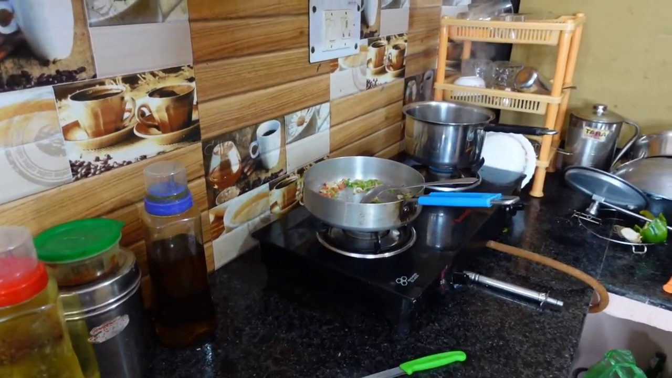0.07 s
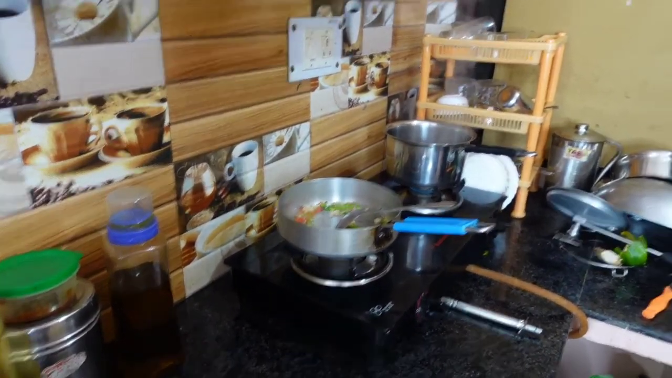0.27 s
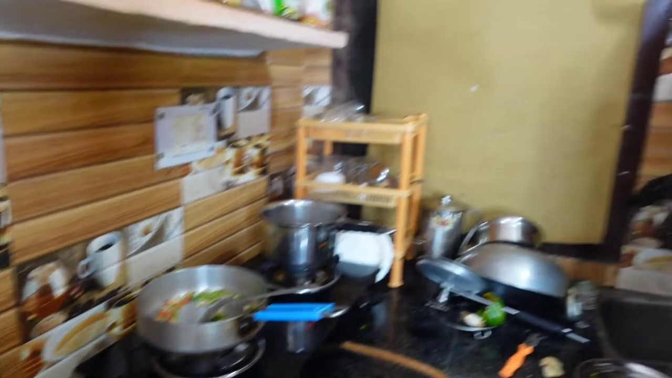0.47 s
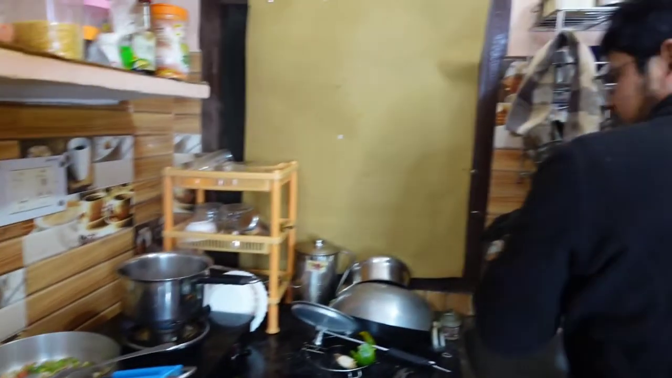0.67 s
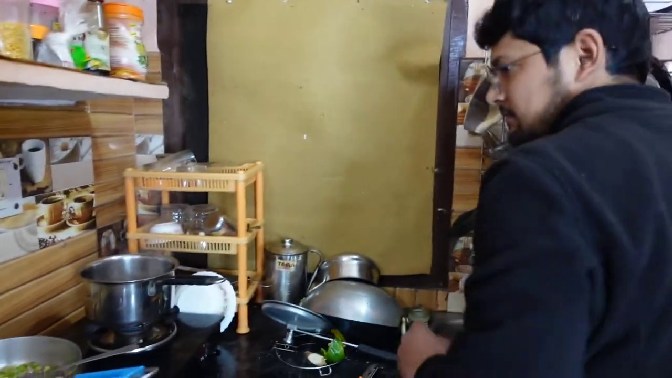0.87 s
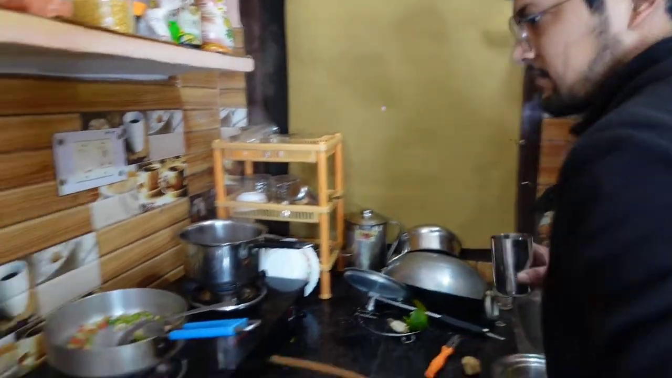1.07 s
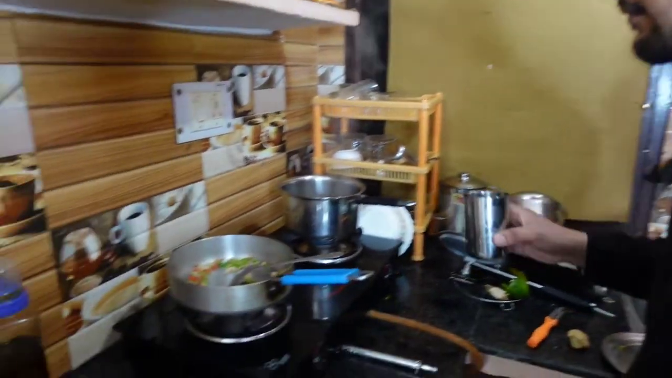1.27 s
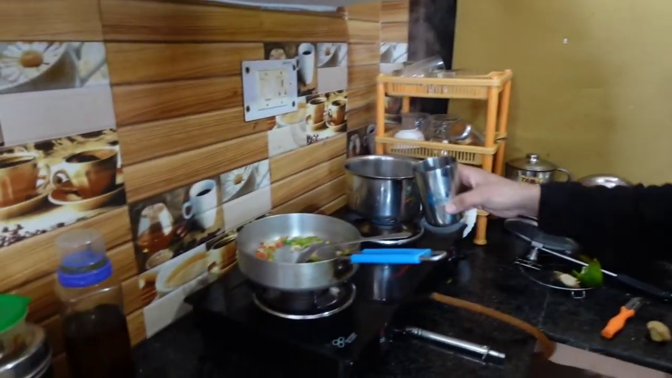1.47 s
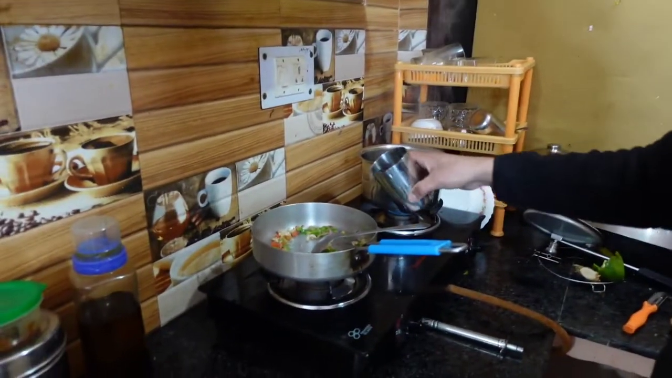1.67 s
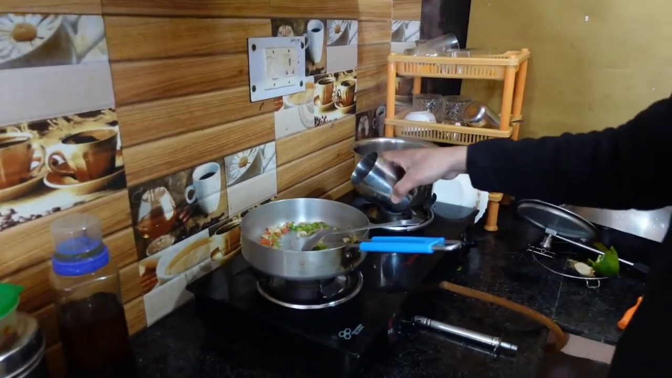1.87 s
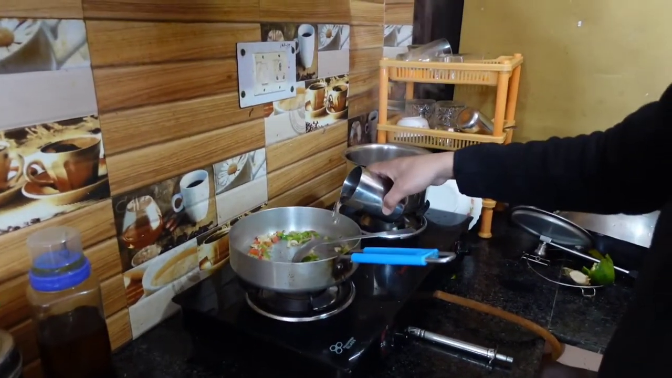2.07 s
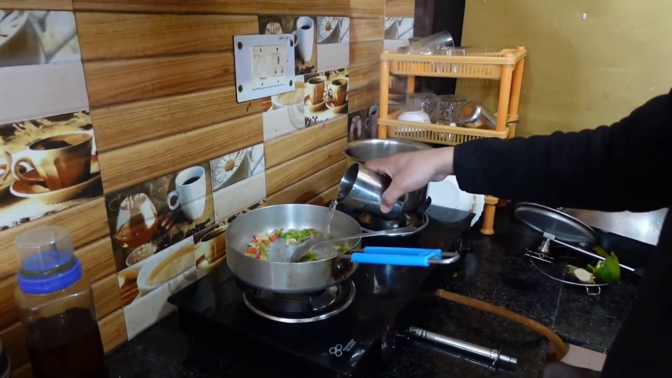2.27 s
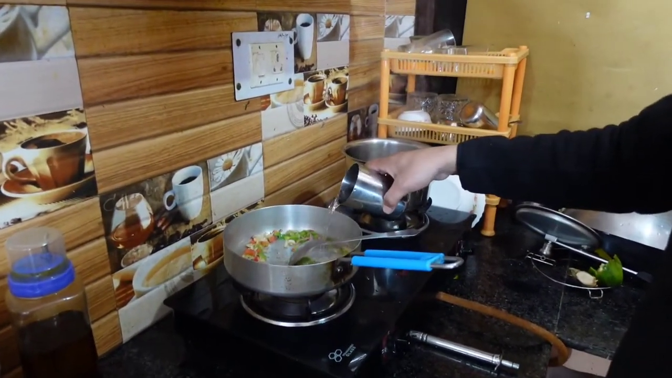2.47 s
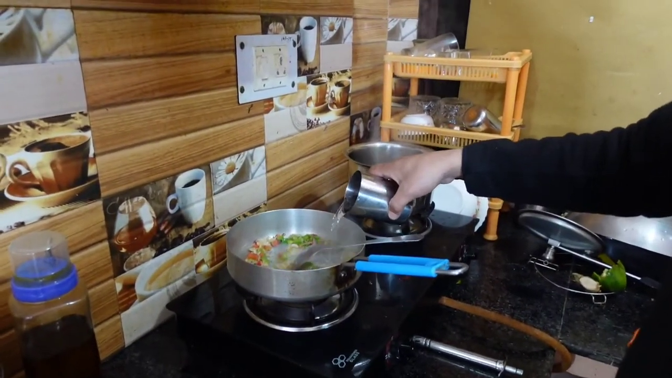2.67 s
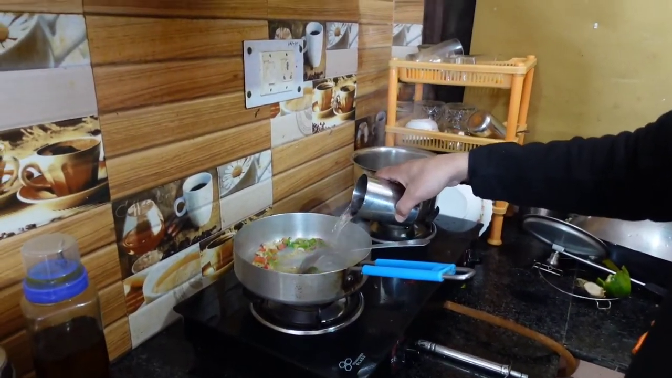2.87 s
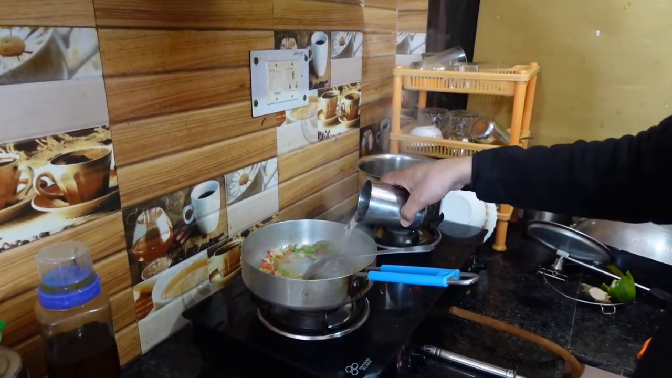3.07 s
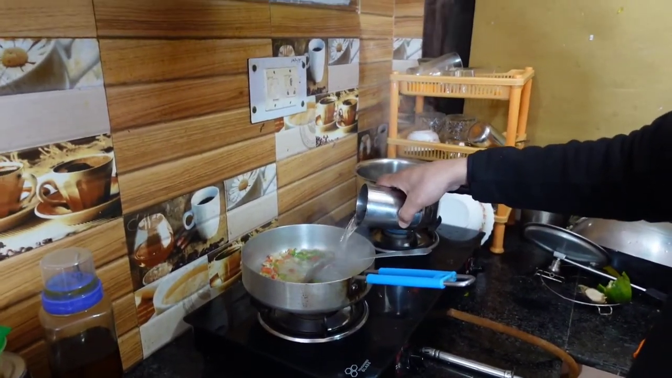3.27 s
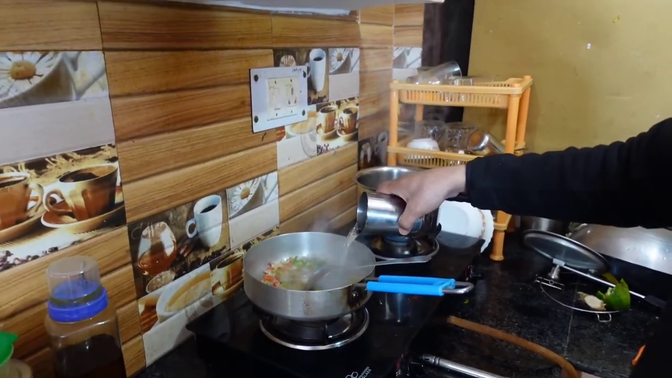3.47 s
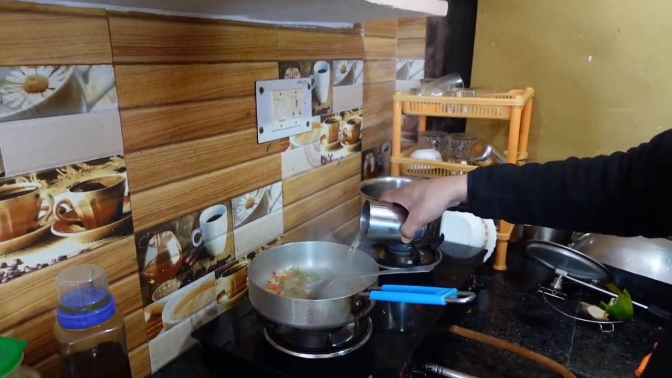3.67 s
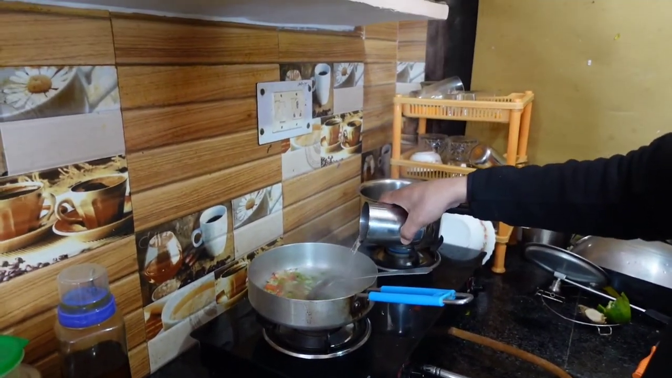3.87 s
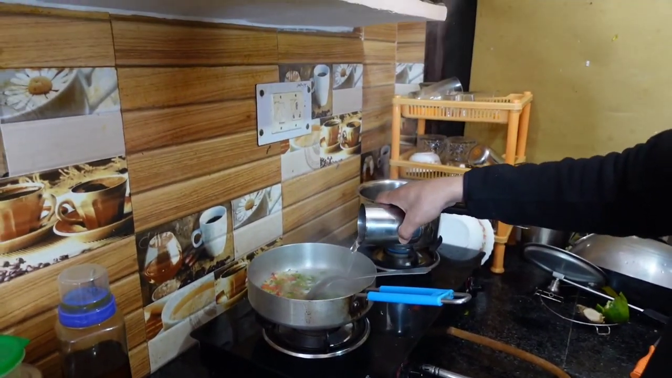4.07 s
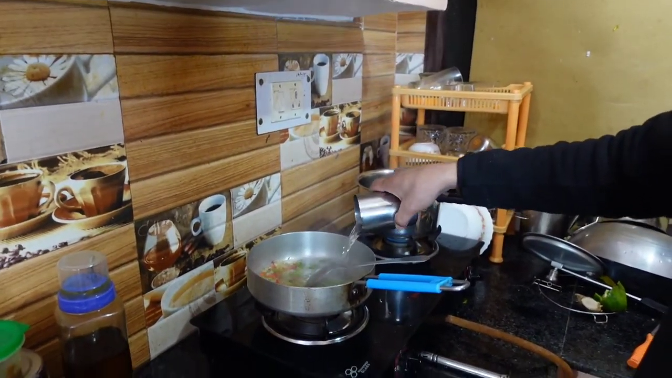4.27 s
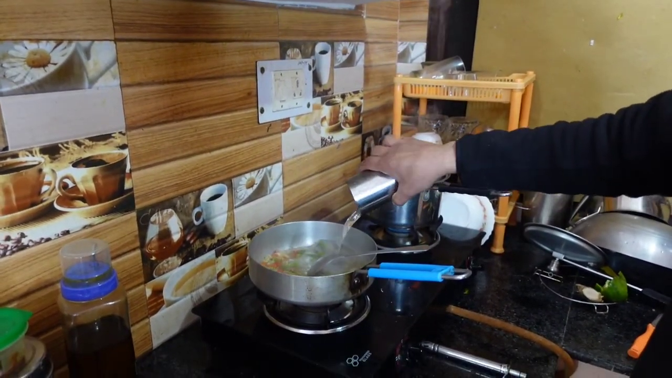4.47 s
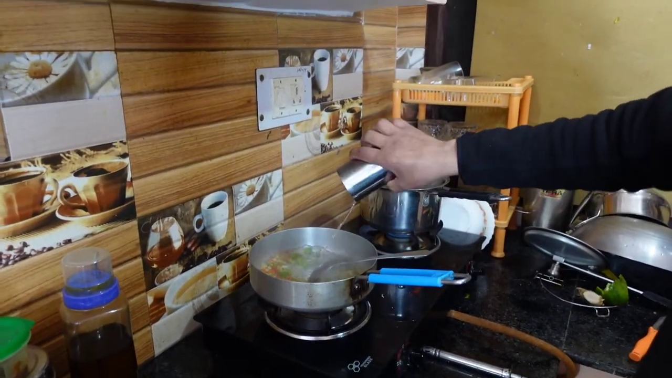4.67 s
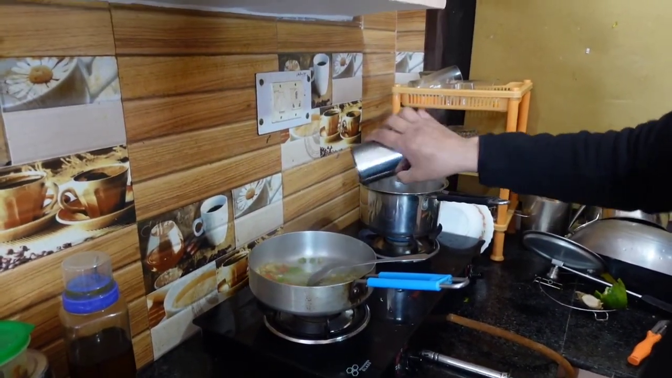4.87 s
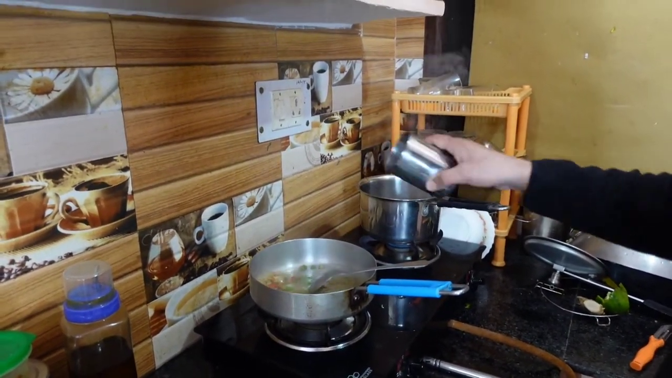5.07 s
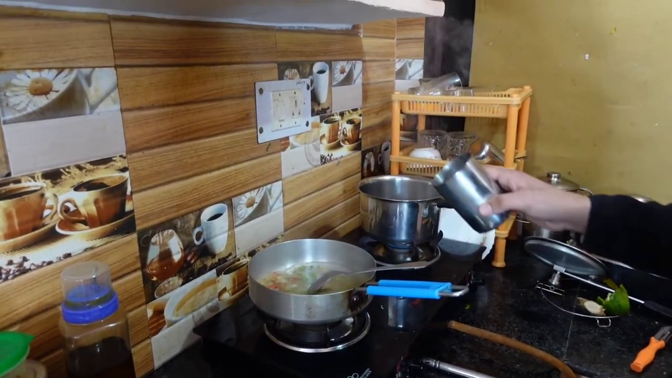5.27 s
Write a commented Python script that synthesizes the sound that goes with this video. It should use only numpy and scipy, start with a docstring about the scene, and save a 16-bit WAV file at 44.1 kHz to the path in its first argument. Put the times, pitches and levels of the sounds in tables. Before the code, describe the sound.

Gentle frying with low microphone rumble gives way to a sudden bright roar of steam as water hits hot metal, fading into sparse pops and bubbling.

```python
"""Water poured into a frying pan

Onion and vegetables fry gently in a steel pan in a small tiled kitchen: filtered random bursts, with spits.
Water from a tumbler flashes to steam: dense bursts hiss loudly, then dull and thin out as the pan cools.
Slower bursts churn in the water, noise cracks make single pops, and decaying sines ring as big bubbles.
Shaped low noise is the rumble of the hand-held microphone; steady noise is the room and the hob fan.
"""
import sys
import numpy as np
from scipy import signal
from scipy.fft import rfft, irfft
from scipy.io import wavfile
from scipy.ndimage import uniform_filter1d

SR = 44100
rng = np.random.default_rng(int(sys.argv[2]) if len(sys.argv) > 2 else 0)


def master(y):
    """Save y as 16-bit WAV."""
    cut = np.clip(np.atleast_2d(y).T, -1, 1)
    pcm = np.round(cut * 32767)  # scale
    wavfile.write(sys.argv[1], SR, pcm.astype(np.int16))


N = 233957
TIME = np.arange(N) / SR   # s
# rel_db: level or lift before later gain or normalization


def from_db(db):
    """Decibels to gain."""
    return 10 ** (np.asarray(db) / 20)


def rms_one(x):
    """Scale to rms 1."""
    return x / np.sqrt(np.mean(x ** 2) + 1e-20)


def in_time(rows):
    """Interpolate each column of a curve at every sample."""
    point_s, *columns = np.transpose(rows)
    return [np.interp(TIME, point_s, column) for column in columns]


def drift(rate_hz):
    """Slow random wander: noise through two equal poles at rate_hz, run at SR / 40."""
    step = 40
    pole = np.exp(-2 * np.pi * rate_hz * step / SR)
    noise = rng.standard_normal(N // step + 2002)
    slow = signal.lfilter([1], [1, -2 * pole, pole * pole], noise)[2000:]   # drop the settling
    return np.interp(np.arange(N) / step, np.arange(len(slow)), rms_one(slow))


def band(x, hz, kind, order=2):
    """Butterworth filter."""
    sos = signal.butter(order, np.clip(hz, 10, .45 * SR), kind, fs=SR, output="sos")
    return signal.sosfilt(sos, x + 1e-18)


def coloured(x, spectrum, resonances=(), size=16384):
    """Minimum-phase filter with the given spectrum and resonances; white noise keeps its power."""
    hz = np.maximum(np.fft.rfftfreq(size, 1 / SR), 1)
    point_hz, point_db = np.transpose(spectrum)
    db = np.interp(np.log(hz), np.log(point_hz), point_db)
    for centre_hz, width_hz, lift_db in resonances:
        db = db + lift_db / (1 + (2 * (hz - centre_hz) / width_hz) ** 2)
    cepstrum = irfft(np.log(rms_one(from_db(db))))
    cepstrum[1:size // 2] *= 2      # fold: nothing sounds before its cause
    cepstrum[size // 2 + 1:] = 0
    impulse = irfft(np.exp(rfft(cepstrum)))
    return signal.fftconvolve(x, impulse)[:N]


def brighten(x, treble_db):
    """Lift or lower the spectrum above about 6 kHz."""
    body = band(x, 6000, "low", order=1)
    return body + from_db(treble_db) * (x - body)


def bursts(per_s, spread_db):
    """Random clicks, many small and a few large; mean power does not follow the rate; rms 1."""
    chance = np.clip(per_s / SR, 1e-6, 1)
    size_db = spread_db * np.minimum(rng.exponential(1, N), 4)
    sizes = from_db(size_db) * rng.standard_normal(N) / np.sqrt(chance)
    return rms_one(sizes * (rng.random(N) < chance))


def crackle(per_s, spread_db, snap_db, hiss_db, count=9):
    """Tiny bubbles ring a cycle or two in their own bands, among broad snaps and smooth steam; rms 1."""
    edges_hz = np.geomspace(350, 18000, count + 1)
    bubbles = np.zeros(N)
    for low_hz, high_hz in zip(edges_hz, edges_hz[1:]):
        bubbles += band(bursts(per_s / count, spread_db), [low_hz, high_hz], "band", order=1)
    snaps = from_db(snap_db) * bursts(per_s / count, spread_db)
    hiss = from_db(hiss_db) * rng.standard_normal(N)
    return rms_one(rms_one(bubbles) + snaps + hiss)


def sputter(per_s, decay_s):
    """Puffs of spray at random times: noise that dies away exponentially after each; rms 1."""
    puffs = (rng.random(N) < per_s / SR) * rng.uniform(.4, 1, N)
    strength = signal.lfilter([1], [1, -np.exp(-1 / (decay_s * SR))], puffs + 1e-18)
    return rms_one(strength * rng.standard_normal(N))


LOW_T60_S, TOP_T60_S, TAIL_DB = 0.26, 0.24, -4.5   # levels relative to the direct sound
WALL_ECHO_S, WALL_ECHO_DB = 0.00134, -8


def echoes(size=12000):
    """From one spot: direct sound, quick echo off the tiles behind the pan, short tail that dulls."""
    age_s = np.arange(size) / SR
    direct = rms_one(1. * (age_s == 0))
    wall = rng.standard_normal(size) * np.exp(-np.abs(age_s - WALL_ECHO_S) / 0.00031)
    scatter = rng.standard_normal(size) * np.clip(age_s / 0.0054, 0, 1)
    dull = band(scatter, 4800, "low", order=1)
    tail = dull * from_db(-60 * age_s / LOW_T60_S) + (scatter - dull) * from_db(-60 * age_s / TOP_T60_S)
    response = direct + from_db(WALL_ECHO_DB) * rms_one(wall) + from_db(TAIL_DB) * rms_one(tail)
    return response / np.linalg.norm(response)


def kitchen(x, count=24, size=96):
    """Bursts come from random spots on the pan, each with its own echoes, so the hiss stays smooth."""
    spot = rng.integers(0, count, N)[np.arange(N) // size]   # one spot per block of samples
    return sum(signal.oaconvolve(x * (spot == k), echoes())[:N] for k in range(count))


# room noise spectrum: hz, rel_db (per Hz)
ROOM_SPECTRUM = [(30, 4.5), (160, -7.5), (270, -6.5), (450, -6), (540, -6), (1000, -9.5), (4000, -17.5)]
# hob fan drone: centre_hz, width_hz, lift_rel_db
FAN_DRONE = [(217, 39, 5), (313, 26, 14), (404, 16, 10.5), (767, 18, 12.5)]


def room_tone():
    """Steady noise of the room, with the faint drone of the hob fan as resonances."""
    return from_db(-53) * coloured(rng.standard_normal(N), ROOM_SPECTRUM, FAN_DRONE)


# colour of all that bursts in the pan: hz, rel_db (per Hz)
PAN_SPECTRUM = [(150, -34.5), (620, -22), (800, -16.5), (1000, -9), (2300, -2.5), (3100, -2.5), (3850, -3),
                (4600, -13.5), (5650, -6), (6300, -5.5), (7050, -12.5), (9500, -9), (11500, -16),
                (15500, -20)]
# pan and the corner it stands in: centre_hz, width_hz, lift_rel_db
PAN_RESONANCES = [(143, 39, 12.5), (226.3, 33, 11.5), (281, 24, 7), (420, 34, 6.5), (460, 39, 7),
                  (553, 16, 6.5), (689.6, 15, 6), (831, 14, 9), (870, 25, -0.5), (932.6, 13, 7.5),
                  (978, 31, 8), (1456, 100, 4), (1760, 39, -4), (2235, 65, 3.5), (2632, 50, 4),
                  (2964, 173, 4.5), (3580, 73, 6)]


def sizzle():
    """Frying, pops and boiling sound through the kitchen and excite the pan resonances."""
    return coloured(kitchen(frying() + pops() + boiling()), PAN_SPECTRUM, PAN_RESONANCES)


# oil frying: time_s, rel_db
FRYING_LEVEL = [(0.0, -40.5), (0.3, -43.5), (1.4, -43.5), (2.2, -40)]


def frying():
    """Moisture from the vegetables crackles in the oil, with small spits and tiny sharp ticks on top."""
    rel_db, = in_time(FRYING_LEVEL)
    fizz = brighten(crackle(per_s=4000, spread_db=3.0, snap_db=0, hiss_db=3.0), treble_db=7.5)
    spits = from_db(-7) * sputter(per_s=90, decay_s=.0006)
    ticks = from_db(-2) * band(sputter(per_s=45, decay_s=.0004), 7500, "high")
    waver_db = .7 * drift(rate_hz=18)
    return from_db(rel_db - 3.5 + waver_db) * (fizz + spits + ticks)


# moves of the hand: start_s, length_s, rel_db
HAND_MOVES = [(0.034, 0.088, -32), (0.212, 0.23, -34), (0.685, 0.093, -35), (0.935, 0.18, -37.5),
              (1.175, .15, -34.5), (1.378, 0.087, -33), (1.503, .11, -29.5), (1.737, 0.077, -38),
              (1.936, 0.081, -39), (2.31, 0.067, -42), (2.92, .17, -41), (5.07, .07, -53)]
# rumble spectrum: hz, rel_db (per Hz)
RUMBLE_SPECTRUM = [(10, 13), (25, -2.5), (45, -7.5), (60, 5.5), (78, -4), (108, -4.5), (128, -24.5),
                   (300, -31), (1000, -69)]
MOVE_EDGE_S = .012
TREMOR_REL_DB, STEADYING_DB_PER_S, FLOOR_REL_DB = -37, 6.5, -59.5   # between moves the hand grows steadier


def handling():
    """Low rumble of the moving microphone, swelling with each move of the hand."""
    tremor = from_db(TREMOR_REL_DB - STEADYING_DB_PER_S * TIME) + from_db(FLOOR_REL_DB)
    moves = np.zeros(N)
    for start_s, length_s, rel_db in HAND_MOVES:
        rise = np.tanh((TIME - start_s) / MOVE_EDGE_S)
        fall = np.tanh((TIME - start_s - length_s) / MOVE_EDGE_S)
        moves += from_db(rel_db) * (rise - fall) / 2
    rumble = coloured(band(rng.standard_normal(N), 9, "high"), RUMBLE_SPECTRUM)
    power = uniform_filter1d(rumble ** 2, size=4000)
    even = rumble / np.sqrt(power + 0.045)   # level out the chance swells
    return from_db(-6) * np.hypot(tremor, moves) * even


# drops bursting, heard 0.8 ms after start_s: start_s, body_rel_db, treble_rel_db
DROP_POPS = [(0.017, -28, -44), (0.493, -23.5, -30.5), (0.598, -26.5, -47), (0.677, -29, -35),
             (0.906, -31, -42), (1.089, -34, -40), (1.138, -40.5, -35), (1.176, -43, -38),
             (1.302, -31, -36), (1.475, -17, -40), (1.671, -40, -35), (1.849, -25.5, -32.5),
             (2.02, -22, -38), (2.041, -33, -37.5), (2.119, -40, -38), (2.356, -9, -19.5),
             (2.867, 0.5, -34), (4.165, -1.5, -38), (4.242, -4.5, -25), (4.34, -3.5, -35),
             (4.393, -6.5, -23), (4.501, -11, -25), (4.606, -12, -29), (4.632, -4.5, -35),
             (4.844, -12, -42), (4.956, -9.5, -45), (5.0355, -4.5, -23.5), (5.065, -25, -39),
             (5.149, -9, -45), (5.178, -12, -40), (5.283, -7.5, -52)]


def pops(size=1500):
    """Each drop bursts with a ragged crack, and its spray fizzes on the metal."""
    out, age_s = np.zeros(N + size), np.arange(size) / SR
    sprays = rng.standard_normal((len(DROP_POPS), size))
    for (start_s, body_db, treble_db), spray in zip(DROP_POPS, sprays):
        strength = .15 * np.exp(-age_s / .0012) + .008 * np.exp(-age_s / .008)
        crack = .7 * (age_s == 0) + spray * strength
        at = int((start_s + .0008) * SR)
        out[at:at + size] += from_db(body_db + 13) * brighten(crack, treble_db - body_db + 17.5)
    return out[:N]


# big bubbles: start_s, rel_db, pitch_hz, t60_s
BUBBLE_RINGS = [(1.476, -33, 1090, 0.012), (4.633, -16, 1190, 0.021), (4.634, -10.5, 2280, .03),
                (4.761, -13, 2240, 0.039), (4.8, -29.5, 246, 0.027), (4.803, -31, 420, 0.04),
                (4.804, -25, 674, .025)]


def big_bubbles():
    """A big bubble rings briefly at one pitch as it opens."""
    out = np.zeros(N)
    for start_s, rel_db, pitch_hz, t60_s in BUBBLE_RINGS:
        age_s = np.clip(TIME - start_s, 0, 1)
        ring = from_db(rel_db - 60 * age_s / t60_s) * np.sin(2 * np.pi * pitch_hz * age_s)
        out += band(ring, pitch_hz / 2, "high")
    return kitchen(out, count=1)


CONTACT_S, SPREAD_S = 2.2315, 0.13   # water meets the metal and spreads over it
WET_FOR_S = np.maximum(TIME - CONTACT_S, 0)


def wetted():
    """Share of the pan that is wet, growing evenly from contact."""
    return np.clip(WET_FOR_S / SPREAD_S, 0, 1)


# water boiling on the hot metal: time_s, rel_db
BOILING_LEVEL = [(2.36, -17), (2.8, -14), (3.25, -15.5), (3.85, -16), (4.3, -21), (5.3, -26)]
# gushes of steam: peak_s, lift_db
STEAM_SURGES = [(2.63, 0), (3.33, 1.5), (3.39, 2.5), (3.53, 2.5), (3.63, 3), (3.89, 2.5), (4.01, 2.5),
                (4.17, 0.5), (4.85, 3)]
SURGE_S = 0.02   # half-width at 1/e of the lift
FULL_BURSTS_PER_S, FULL_BOIL_REL_DB, RATE_DB_PER_DB = 24000, -14, 1.3   # bursts thin out as the boil weakens
TREBLE_DB, DULLING_DB_PER_S = 2, 6.5   # the hiss dulls as the pan cools
FLASH_DB, FLASH_S = 13.5, 0.069   # the first drops flash off much brighter
BODY_DB, THIN_DB, FILL_S = 1, 9.5, 0.29   # the low part fills in as water gathers


def boiling():
    """Water flashes to steam in uneven surges; as the pan cools the bursts get fewer, larger and duller."""
    rel_db, = in_time(BOILING_LEVEL)
    per_s = FULL_BURSTS_PER_S * from_db(RATE_DB_PER_DB * (rel_db - FULL_BOIL_REL_DB))
    treble_db = TREBLE_DB - DULLING_DB_PER_S * WET_FOR_S + FLASH_DB * np.exp(-WET_FOR_S / FLASH_S)
    body_db = BODY_DB - THIN_DB * np.exp(-WET_FOR_S / FILL_S)
    spits = from_db(-9) * sputter(per_s=130, decay_s=.0012)
    steam = brighten(crackle(per_s, spread_db=3.5, snap_db=-4.5, hiss_db=-2) + spits, treble_db)
    steam = steam + (from_db(body_db) - 1) * band(steam, 1430, "low", order=1)
    droplets = from_db(-11) * band(sputter(per_s=45, decay_s=.001), 7500, "high")
    surge_db = sum(lift_db * np.exp(-((TIME - peak_s) / SURGE_S) ** 2) for peak_s, lift_db in STEAM_SURGES)
    waver_db = 0.35 * drift(rate_hz=13) + 0.64 * drift(rate_hz=120)
    return wetted() * from_db(rel_db - 0.22 + surge_db + waver_db) * (steam + droplets)


# water churning on the bottom of the pan: time_s, rel_db
CHURN_LEVEL = [(2.3, -64), (3.55, -43.5), (5.3, -46)]
# churn spectrum: hz, rel_db (per Hz)
CHURN_SPECTRUM = [(60, -24), (110, -9.5), (190, -10), (350, 1), (480, 1), (700, 4), (1100, 2), (2500, -30)]


def churning():
    """Larger bubbles slop about in the gathering water: sparser, low-coloured bursts."""
    rel_db, = in_time(CHURN_LEVEL)
    slop = wetted() * from_db(rel_db) * bursts(per_s=1800, spread_db=1.0)
    return coloured(kitchen(slop, count=4), CHURN_SPECTRUM, PAN_RESONANCES)


def scene():
    """Sum of the pan, the room tone and the microphone rumble, as one channel."""
    return (room_tone() + sizzle() + handling() + big_bubbles() + churning())[None]


def record(dry):
    """Round the highest peaks smoothly toward 0.88 and cut the top above 15.6 kHz."""
    rounded = dry / (1 + (dry / .88) ** 4) ** .25
    top_cut = signal.ellip(12, .1, 80, 15600, fs=SR, output="sos")
    return signal.sosfilt(top_cut, rounded)


dry = scene()
out = record(dry)
master(out)
```